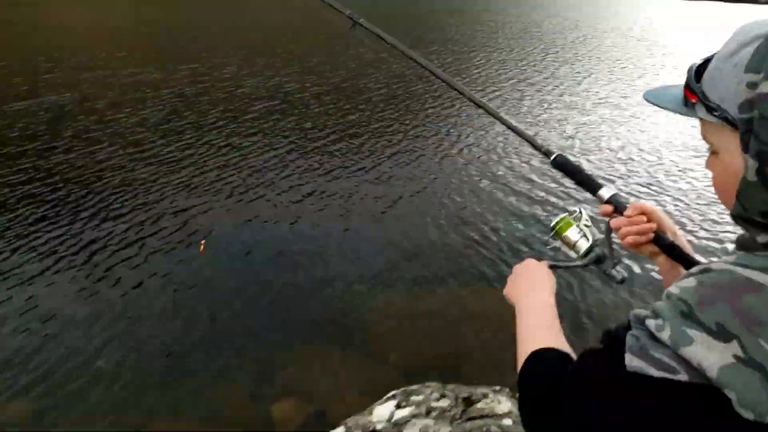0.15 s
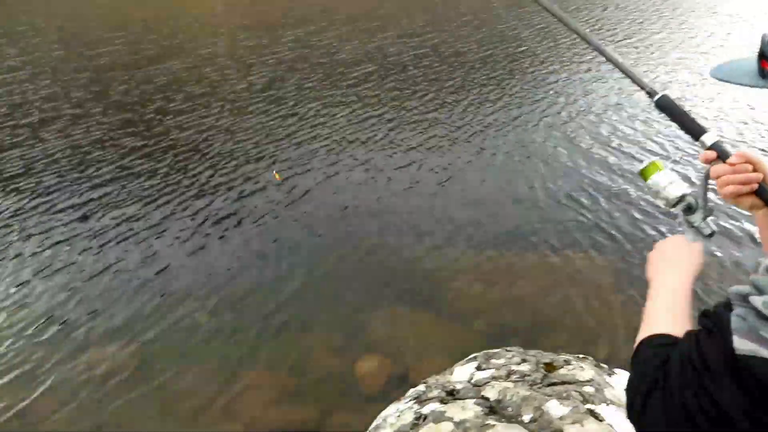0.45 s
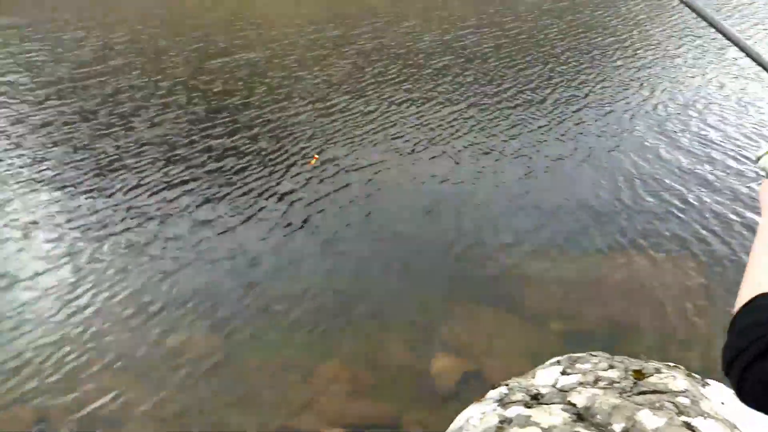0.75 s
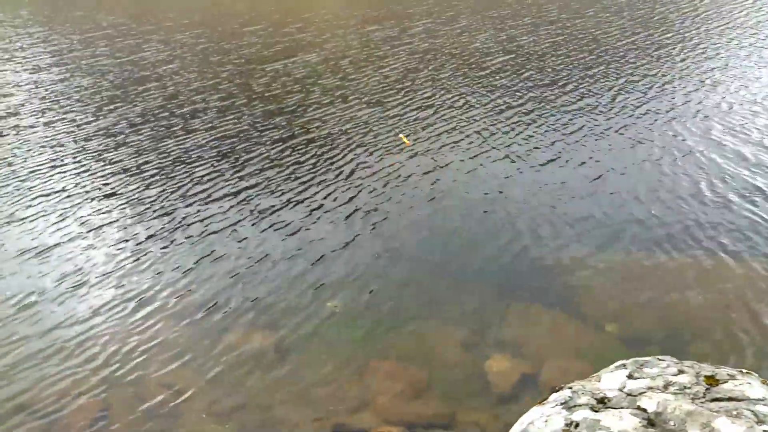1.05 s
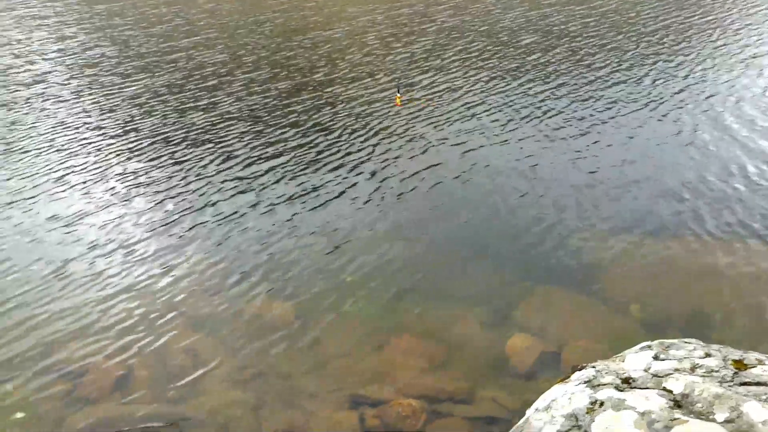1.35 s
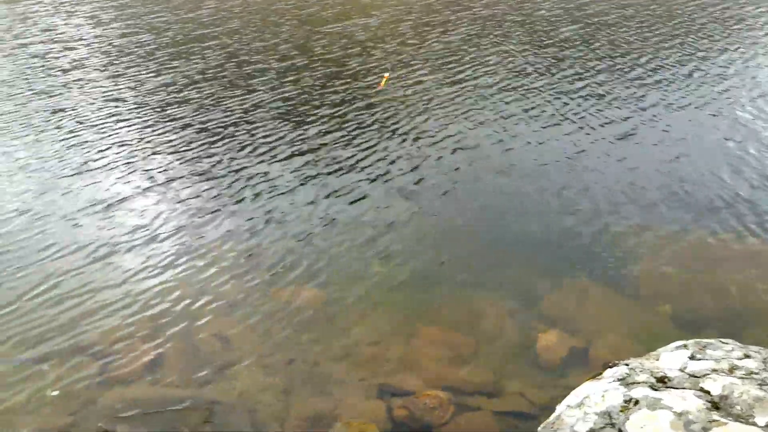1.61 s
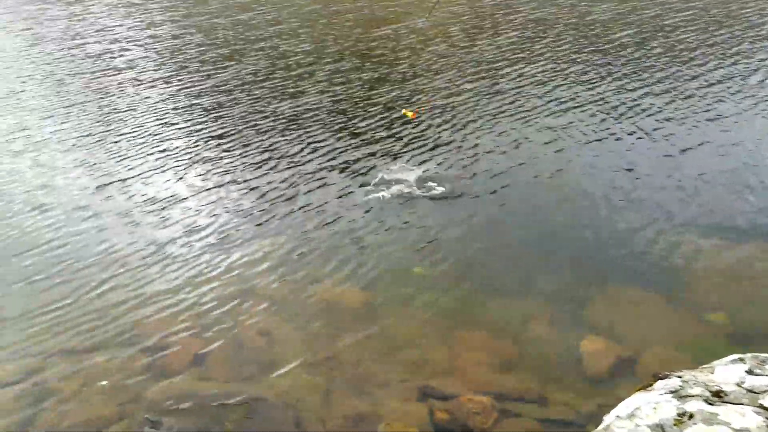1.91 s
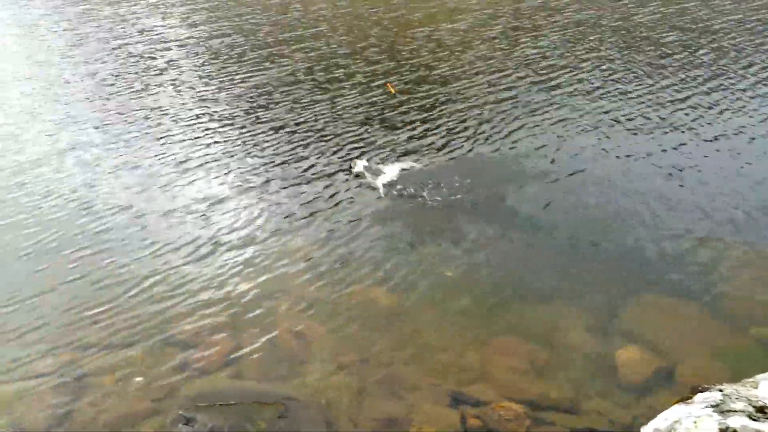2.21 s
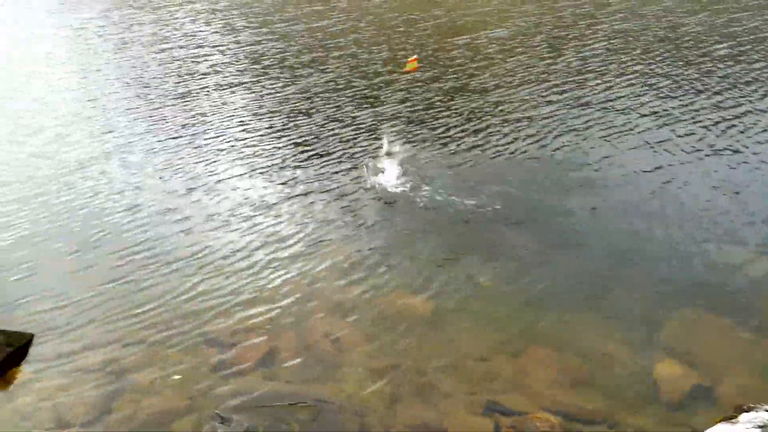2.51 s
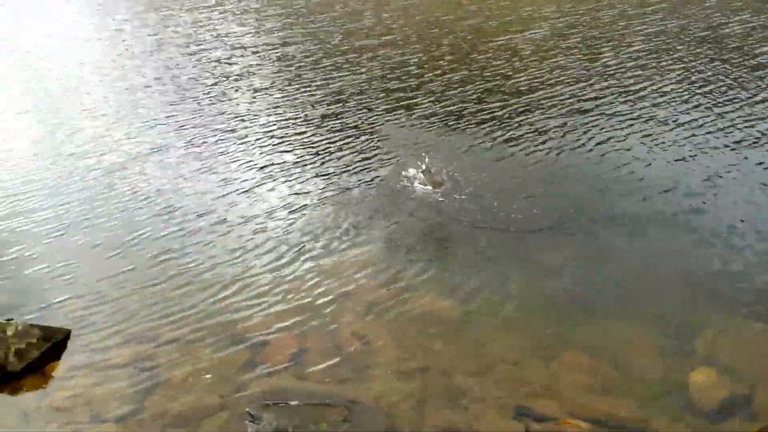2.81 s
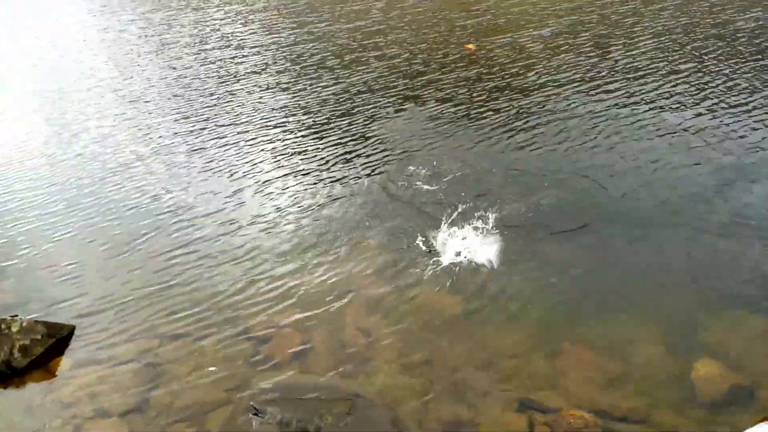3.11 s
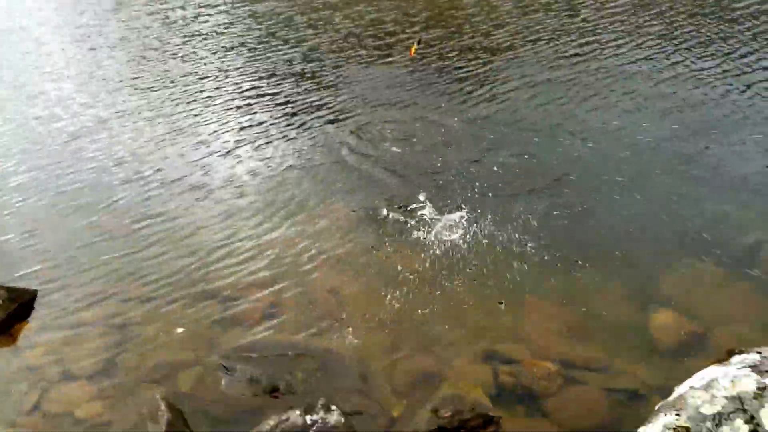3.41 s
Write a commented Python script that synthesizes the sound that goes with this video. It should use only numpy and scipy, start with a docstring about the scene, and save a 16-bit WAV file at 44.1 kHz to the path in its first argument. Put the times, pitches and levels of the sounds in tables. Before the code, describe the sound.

A fish thrashes in lake shallows with sharp slaps, plops and fizzing bubbles, after a nearby fishing reel ticks in quick runs and the line hisses softly. Light gusts rumble on the hand-held microphone.

```python
"""A hooked fish thrashes at the surface of a lake while a fishing reel whirs close by.
The reel's gears hum and tick in quick runs, its body rings and whines, and the line hisses.
The fish slaps the water and churns it into bubbles: big ones plop, small ones fizz in a spray.
Wind rumbles on the microphone of a hand-held camera, and fingers bump its case."""
import sys
import numpy as np
from scipy import signal
from scipy.fft import rfft, irfft
from scipy.io import wavfile
from scipy.ndimage import uniform_filter1d

SR = 44100
rng = np.random.default_rng(int(sys.argv[2]) if len(sys.argv) > 2 else 0)


def output_pcm(signal):
    """Save a mono or channel-first signal as 16-bit PCM at the path in sys.argv[1].

    Samples are clipped to [-1, 1] before scaling.
    """
    pcm = np.clip(np.atleast_2d(signal).T, -1, 1) * 32767
    wavfile.write(sys.argv[1], SR, np.round(pcm).astype(np.int16))


N = 156555

# The bright noise in ticks, line hiss and slaps. Each row: frequency in Hz, relative level in dB.
BRIGHT_SPECTRUM = [(1500, -32), (2500, -7.5), (2900, -9.5), (3620, -10), (6850, 3), (7800, -13.5),
                   (10000, -4.5), (13500, -3), (15100, 6.5), (16400, -12.5)]


def amp(db):
    """Turns decibels into a number to multiply by."""
    return 10 ** (np.asarray(db) / 20)


def evened(x):
    """Scales a sound to an average (RMS) level of 1."""
    return x / np.sqrt(np.mean(x ** 2) + 1e-20)


def loudness(rows, before_db=None):
    """Joins (seconds, dB) points into a volume curve for the whole scene."""
    seconds, db = np.transpose(rows)
    return amp(np.interp(np.arange(N) / SR, seconds, db, left=before_db))


def gains(spectrum, hz):
    """Looks up how strong a spectrum is at the given frequencies."""
    known_hz, db = np.transpose(spectrum)
    return amp(np.interp(np.log(hz + 1), np.log(known_hz + 1), db, left=-90, right=-90))


def colour(x, spectrum):
    """Filters a sound to a spectrum."""
    padded = 2 * len(x)
    return irfft(rfft(x, padded) * gains(spectrum, np.fft.rfftfreq(padded, 1 / SR)))[:len(x)]


def band_rms(x, lo_hz, hi_hz):
    """The average level between two frequencies."""
    hz = np.fft.rfftfreq(len(x), 1 / SR)
    band = rfft(x)[(hz > lo_hz) & (hz < hi_hz)]
    return np.sqrt(2 * np.sum(abs(band) ** 2)) / len(x)


def add(mix, start_s, sound):
    """Mixes a sound in at its start time."""
    part = mix[round(start_s * SR):][:len(sound)]
    part += sound[:len(part)]


def resonate(x, hz, width_hz):
    """Makes a sound ring around one pitch."""
    r = np.exp(-np.pi * width_hz / SR)
    return 2 * signal.lfilter([1 - r], [1, -r * np.exp(2j * np.pi * hz / SR)], x).real


def flutter(depth_db, samples):
    """A random wavering of level; more samples make it slower."""
    drift = uniform_filter1d(uniform_filter1d(rng.standard_normal(N), samples), samples)
    return amp(depth_db * evened(drift))


def ping(hz, t60, glide, attack_s):
    """A tone that fades by 60 dB in t60 seconds; its pitch slides up, or down if glide is negative."""
    t = np.arange(round(t60 * SR) + 2) / SR
    envelope = np.minimum(t / attack_s, 1) * amp(-60 * t / t60)
    return envelope * np.sin(2 * np.pi * hz * t * (1 + glide * t / t60))


def reel():
    """Turning gears make a broad whir and a faint hum, and the reel's body rings."""
    # The whir's tone. Each row: frequency in Hz, relative level in dB.
    whir_spectrum = [(150, -17), (457, -14.5), (1000, -13.5), (1150, 0.5), (1740, -1), (2030, 1.5),
                     (2330, 1.5), (3010, 4), (5030, 2), (6280, 6), (7980, -21), (9000, -36), (11700, -90)]
    # How loud the gears are. Each row: time in seconds, level in dB.
    whir_levels = [(0, -59), (.17, -55.5), (.36, -63.5), (.5, -56), (.65, -64), (1.0, -60.5), (1.4, -58.5),
                   (1.6, -59), (1.88, -57.5), (1.93, -87), (1.96, -55.5), (2.2, -54.5), (2.55, -56.5),
                   (2.8, -61), (3.0, -64.5), (3.1, -61), (3.14, -47), (3.22, -63.5), (3.44, -48),
                   (3.5, -71), (3.55, -64)]
    # The notes of the body. Each row: pitch in Hz, width in Hz, relative level in dB.
    body_notes = [(2020, 45, -6), (2939, 66, -4), (3076, 24, -8.5), (3304, 33, -7), (3627, 39, -13),
                  (3980, 26, -11.5), (4200, 27, -6), (4800, 28, -11), (5500, 39, -6)]
    # How loud the body rings. Each row: time in seconds, level in dB.
    ring_levels = [(0, -71.5), (.3, -63), (.7, -68), (1.4, -65), (1.9, -77), (3.55, -71.5)]
    hum_hz, hum_width_hz, hum_db, patch_db = 394, 130, -25.5, 2.8
    noise = colour(rng.standard_normal(N) * flutter(2.83, samples=60), whir_spectrum)
    # Cut the noise into small patches of pitch and time, and make each louder or softer.
    grid = signal.stft(noise, nperseg=1024, noverlap=768)[2]
    patches = uniform_filter1d(rng.standard_normal(grid.shape), size=14, axis=1)
    patches = evened(uniform_filter1d(patches, size=2, axis=0))
    whir = signal.istft(grid * amp(patch_db * patches), nperseg=1024, noverlap=768)[1][:N]
    whir = whir * flutter(1.6, samples=900) / band_rms(whir, 2600, 7000)
    hum = resonate(rng.standard_normal(N), hum_hz, hum_width_hz)
    hum = evened(resonate(hum, hum_hz, hum_width_hz))
    gears = whir + amp(hum_db) * hum * flutter(6.0, samples=1500)
    ring = sum(amp(db) * flutter(6.2, samples=1200) * evened(resonate(rng.standard_normal(N), hz, width))
               for hz, width, db in body_notes)
    return gears * loudness(whir_levels) + ring * loudness(ring_levels)


def line_and_ticks():
    """The running line hisses, and the gears tick in runs, each tick a tiny burst of bright noise."""
    # The line's hiss. Each row: time in seconds, level in dB.
    hiss_levels = [(0, -67.5), (.33, -60), (.35, -80), (.38, -75), (.42, -64), (.58, -63.5), (.69, -78),
                   (.8, -60.5), (1.1, -60), (1.36, -61.5), (1.39, -75.5), (1.55, -79), (1.6, -62.5),
                   (1.93, -71.5), (2.02, -63.5), (2.4, -66.5), (2.8, -69), (3.0, -68.5), (3.04, -62),
                   (3.1, -66), (3.15, -57), (3.55, -58)]
    # Runs of ticks. Each row: start and length in seconds, ticks per second, level in dB before boost.
    tick_runs = [(0.078, 0.014, 126, -45), (.114, 0.17, 130, -49.5), (.2015, 0.046, 206, -38),
                 (0.259, 0.016, 134, -37.5), (.2915, 0.018, 263, -40.5), (.3225, 0.019, 154, -42),
                 (.3895, 0.0095, 187, -40), (.4055, 0.048, 140, -45), (.7135, 0.024, 180, -47.5),
                 (0.8945, 0.13, 224, -42), (1.051, 0.084, 98, -48.5), (1.152, 0.081, 126, -45.5),
                 (1.24, 0.078, 114, -49.5), (1.33, 0.043, 290, -48.5), (1.561, 0.039, 290, -41),
                 (1.616, 0.008, 520, -44), (1.6655, 0.017, 240, -40.5), (1.7326, 0.026, 120, -45),
                 (1.9655, 0.032, 117, -49), (2.0125, 0.013, 220, -42), (2.05, 0.0054, 350, -36.5),
                 (2.088, 0.03, 390, -40), (2.1892, 0.034, 365, -38), (2.338, 0.12, 110, -54),
                 (2.676, 0.0045, 200, -47)]
    boost_db, spread_db, jitter = 5.5, 1, 0.06  # jitter is a share of the gap between ticks
    rise_s, t60 = .0003, .0025
    clicks = np.zeros(N)
    for start, length, rate, db in tick_runs:
        late, louder = rng.standard_normal((40, 2)).T
        offsets = np.arange(len(late)) / rate
        progress = np.clip((offsets + .5 / rate) / (length + 1 / rate), 0, 1)
        swell = np.sin(np.pi * progress) ** 0.75
        where = np.round((start + offsets + jitter * late / rate) * SR).astype(int)
        clicks[np.clip(where, 0, N - 1)] += swell * amp(db + boost_db + spread_db * louder)
    t = np.arange(400) / SR
    tick_shape = np.minimum(t / rise_s, 1) * amp(-60 * t / t60)
    ticks = signal.oaconvolve(clicks, tick_shape)[:N]
    noise = colour(rng.standard_normal(N), BRIGHT_SPECTRUM)
    hiss = loudness(hiss_levels) * flutter(2.48, samples=50) * flutter(4.13, samples=500)
    return (hiss + ticks) * noise / band_rms(noise, 8000, 16000)


def wind():
    """Gusts hit the microphone and make a lumpy, low rumble."""
    # The rumble's tone. Each row: frequency in Hz, relative level in dB.
    gust_spectrum = [(20, -42), (54, 3.5), (83, 1.5), (143, -16.5), (260, -45), (340, -65)]
    # The gusts. Each row: time in seconds, level in dB.
    gust_levels = [(0, -80), (.07, -64), (.15, -85.5), (.58, -92.5), (.68, -80.5), (.84, -64), (.88, -63),
                   (.93, -68), (1.02, -40), (1.06, -81), (1.17, -79), (1.21, -54), (1.29, -55), (1.34, -79),
                   (1.42, -80.5), (2.0, -83.5), (2.07, -48), (2.13, -93), (2.53, -69), (2.58, -86),
                   (2.71, -51), (2.8, -95), (2.88, -72), (3.28, -78), (3.42, -64), (3.55, -69)]
    rumble = colour(rng.standard_normal(N), gust_spectrum) * flutter(3, samples=900)
    return rumble / band_rms(rumble, 35, 140) * loudness(gust_levels)


def finger_bumps():
    """Fingers knock the camera case: short, low thumps that fall in pitch."""
    # Each row: start in seconds, level in dB, pitch in Hz, fade time in seconds.
    bumps = [(0.059, -23, 178, 0.014), (0.091, -44, 92, 0.037), (.603, -38, 167, 0.092),
             (.599, -31.5, 380, 0.027), (2.052, -43.5, 96, 0.12)]
    mix = np.zeros(N)
    for start, db, hz, t60 in bumps:
        add(mix, start, -amp(db) * ping(hz, t60, glide=-0.3, attack_s=0.0029))
    return mix


def reel_whine():
    """A thin tone from the reel swells briefly now and then."""
    # Each row: middle of the swell in seconds, level in dB.
    swells = [(.19, -68.5), (.284, -60), (0.459, -60), (.565, -67), (0.699, -74), (0.831, -63), (.99, -75),
              (1.329, -65.5), (1.431, -67.5), (1.53, -73)]
    hz, swell_s = 1220, 0.037
    t = np.arange(N) / SR
    tone = evened(resonate(rng.standard_normal(N), hz, width_hz=10.8)) + np.sin(2 * np.pi * hz * t)
    return tone * sum(amp(db) * np.exp(-((t - middle) / swell_s) ** 2) for middle, db in swells)


def water_slaps():
    """The fish smacks the water: each slap is a sharp pulse in a short spray of noise."""
    # Each row: time in seconds, level in dB, pitch in Hz, relative treble and spray levels in dB,
    # fade time of the spray in seconds.
    slaps = [(0.5983, -23.5, 860, -23, -17, 0.065), (2.3972, -31, 5500, -13, 0, 0.013),
             (2.401, -16.5, 1960, -3.5, -7.5, 0.024), (3.0235, -23.5, 6160, -1, -4.5, 0.02),
             (3.0408, -20.5, 2900, -1.5, -4, 0.033), (3.057, -26.5, 3120, -3, -4, 0.05),
             (3.1117, -24.5, 1560, -29, -9.5, 0.022), (3.13, -28.5, 820, -5, -19, 0.028),
             (3.14, -34.5, 4800, -5, -5, 0.11), (3.526, -36.5, 5030, -13, -5, 0.051)]
    pulse_cycles, lead_s = 3.2, .0015  # the spray starts lead_s before the pulse
    t = np.arange(4000) / SR
    mix = np.zeros(N)
    for time, db, hz, treble_db, spray_db, t60 in slaps:
        noise = rng.standard_normal((2, len(t)))
        bright = amp(treble_db) * evened(colour(noise[1], BRIGHT_SPECTRUM))
        width_hz = 0.83 * hz
        spray = evened(resonate(resonate(noise[0], hz, width_hz), hz, width_hz)) + bright
        spray *= amp(spray_db - 60 * t / t60) * np.minimum(t / lead_s, 1) ** 2
        smack = -amp(-60 * t * hz / pulse_cycles) * np.sin(2 * np.pi * hz * t)
        snap = bright * amp(-60 * t / 0.0013)
        pulse = signal.lfilter(*signal.butter(2, 0.15 * hz, "high", fs=SR), smack + snap)
        pulse = np.roll(pulse, round(lead_s * SR))
        add(mix, time - lead_s, amp(db) * (pulse + spray))
    return mix


def froth():
    """Churned water fills with small bubbles, each ringing briefly, over a little hiss."""
    # How loud the churning is. Each row: time in seconds, level in dB.
    churn_levels = [(1.7, -85), (1.83, -68.5), (1.93, -72.5), (2.0, -59), (2.09, -69.5), (2.2, -52.5),
                    (2.26, -56.5), (2.33, -52.5), (2.42, -55), (2.5, -59), (2.535, -42), (2.58, -63.5),
                    (2.8, -70), (2.98, -89), (3.1, -67.5), (3.14, -51), (3.19, -51.5), (3.21, -54),
                    (3.3, -54), (3.44, -49.5), (3.47, -62.5), (3.55, -67)]
    # The froth's tone. Each row: frequency in Hz, relative level in dB.
    froth_spectrum = [(150, -57), (250, -14), (477, 0.5), (825, 3.5), (1340, 3), (1590, 1.5), (2060, -3),
                      (6360, -25), (7000, -10), (9100, -46)]
    bubbles_per_s, spread_db, hiss_share, pitch_count = 450, 3.5, .45, 30
    strength = amp(spread_db * np.minimum(rng.exponential(1, N), 3))
    births = strength * (rng.random(N) < bubbles_per_s / SR)
    pitch_index = rng.integers(0, pitch_count, N)
    bubbles = np.zeros(N)
    for k, hz in enumerate(np.geomspace(220, 6500, pitch_count)):
        cycles = 9.5 * rng.uniform(0.88, 5.4)
        bubble = ping(hz, cycles / hz, glide=0.169 * rng.uniform(1, 2.93), attack_s=1 / hz)
        bubble *= gains(froth_spectrum, hz) * hz
        bubbles += signal.oaconvolve(births * (pitch_index == k), bubble)[:N]
    fizz = evened(bubbles) + hiss_share * evened(colour(rng.standard_normal(N), froth_spectrum))
    return fizz / band_rms(fizz, 350, 1150) * loudness(churn_levels, before_db=-120)


def plops():
    """Single big bubbles ring with a rising pitch."""
    # Each row: start in seconds, level in dB, pitch in Hz.
    big_bubbles = [(1.867, -39.5, 817), (1.95, -49, 1440), (1.965, -42, 1180), (1.978, -36, 740),
                   (2.157, -37, 1390), (2.176, -38, 810), (2.202, -38, 600), (2.229, -45, 380),
                   (2.291, -29.5, 656), (2.486, -38.5, 1156), (2.515, -29.5, 566), (2.399, -26, 870),
                   (2.532, -37, 700), (2.672, -47, 826), (2.876, -36, 1700), (2.925, -41, 1500),
                   (3.146, -37.5, 420), (3.183, -41, 920), (3.182, -42, 251), (3.294, -37, 382),
                   (3.304, -35, 1570), (3.327, -27, 815), (3.38, -47, 720), (3.411, -33.5, 1480),
                   (3.427, -44, 880), (3.448, -26, 2240), (3.487, -51, 355)]
    mix = np.zeros(N)
    for start, db, hz in big_bubbles:
        t60 = 0.027 * (800 / hz) ** 0.59  # smaller, higher bubbles die sooner
        add(mix, start, amp(db) * ping(hz, t60, glide=0.23, attack_s=0.0025))
    return mix


def scene():
    """Adds all the sounds into one channel."""
    hits = finger_bumps() + water_slaps() + plops()
    return (hits + reel() + reel_whine() + line_and_ticks() + froth() + wind())[None]


def record(dry):
    """Cuts off the very highest treble."""
    cutoff_hz = 16100
    low_pass = signal.firwin(511, cutoff_hz, window=("kaiser", 9), fs=SR)
    return signal.oaconvolve(dry, low_pass[None], "same")


dry = scene()
out = record(dry)
output_pcm(out)
```